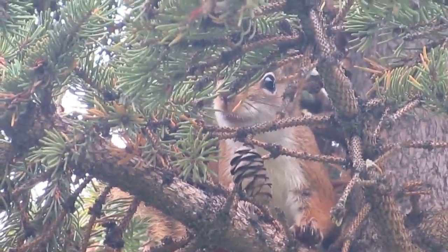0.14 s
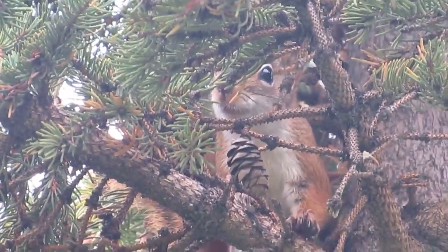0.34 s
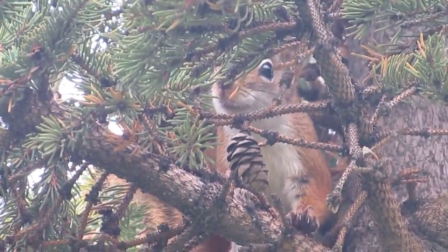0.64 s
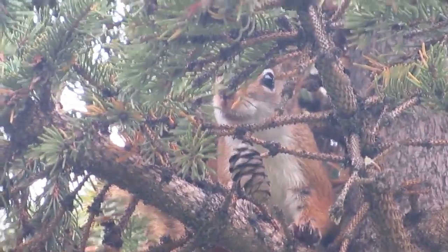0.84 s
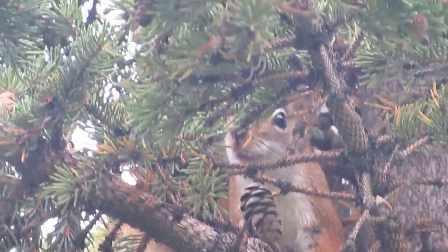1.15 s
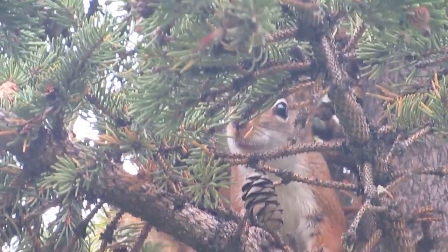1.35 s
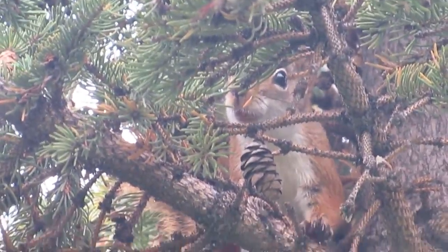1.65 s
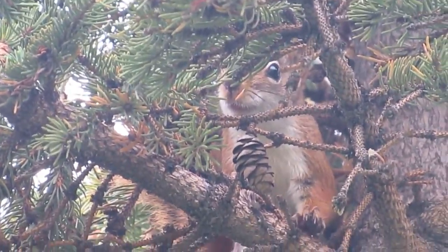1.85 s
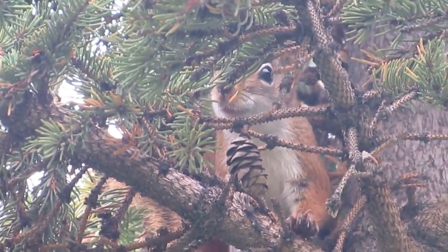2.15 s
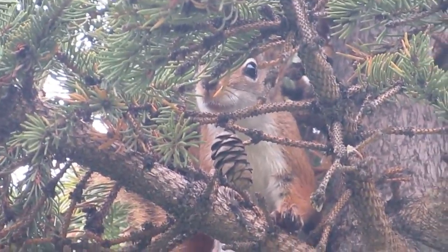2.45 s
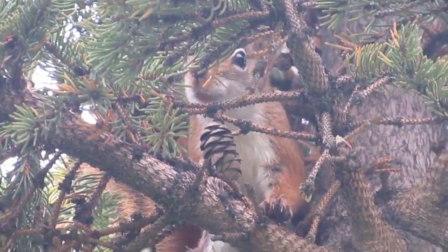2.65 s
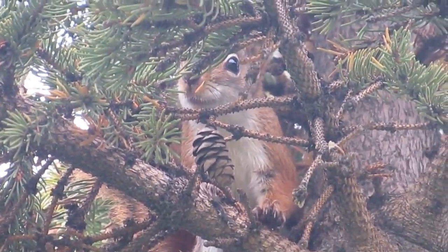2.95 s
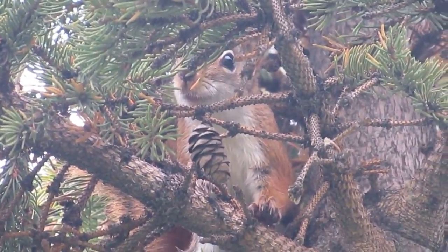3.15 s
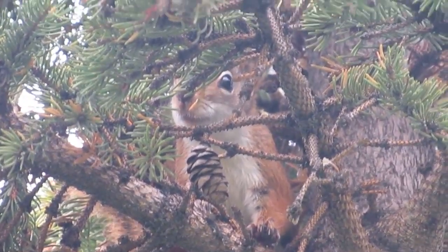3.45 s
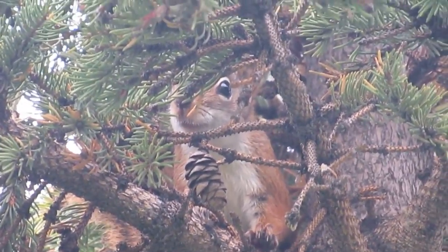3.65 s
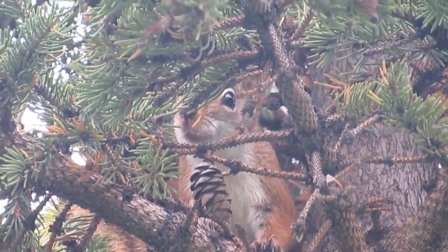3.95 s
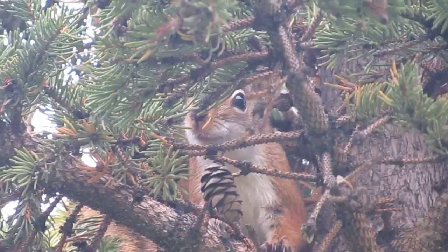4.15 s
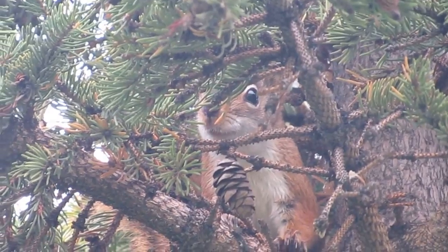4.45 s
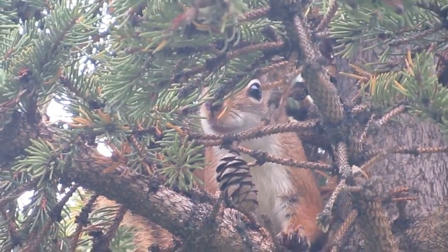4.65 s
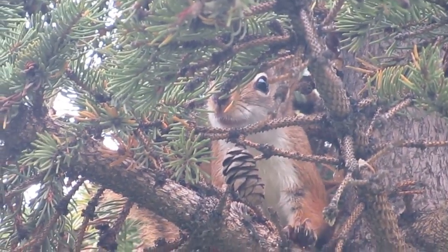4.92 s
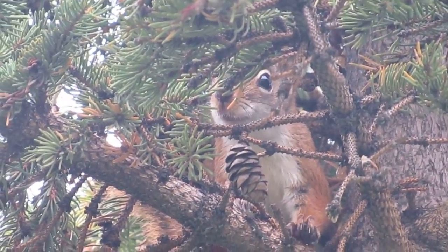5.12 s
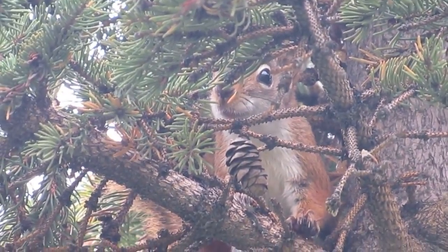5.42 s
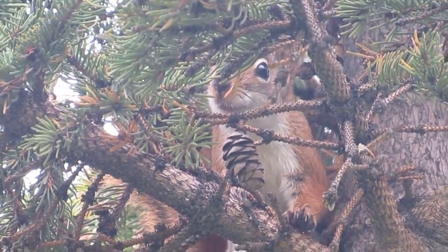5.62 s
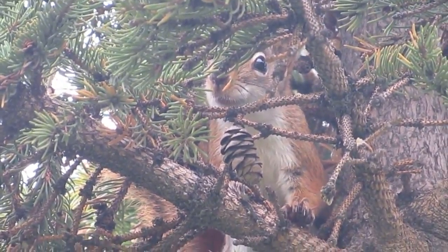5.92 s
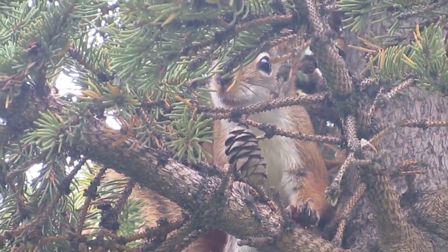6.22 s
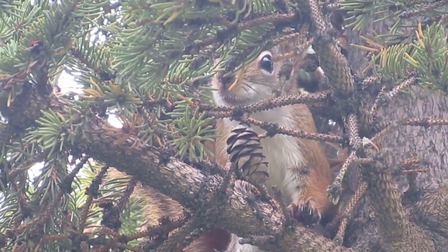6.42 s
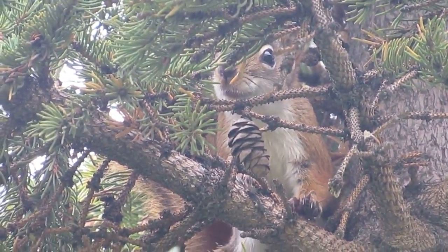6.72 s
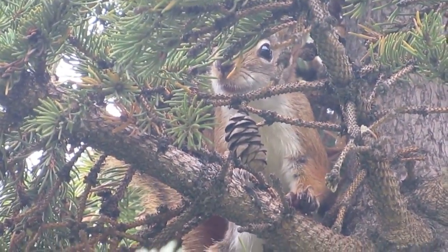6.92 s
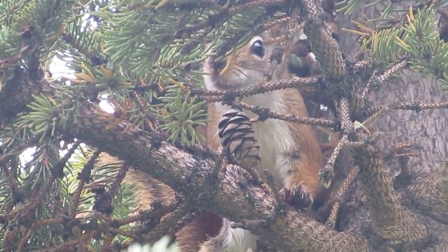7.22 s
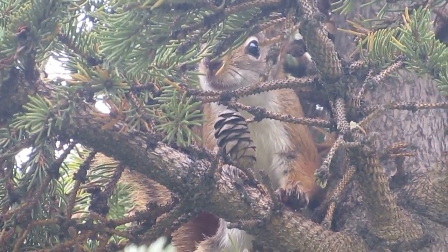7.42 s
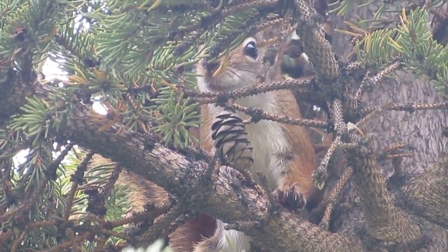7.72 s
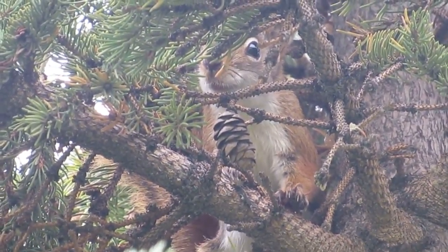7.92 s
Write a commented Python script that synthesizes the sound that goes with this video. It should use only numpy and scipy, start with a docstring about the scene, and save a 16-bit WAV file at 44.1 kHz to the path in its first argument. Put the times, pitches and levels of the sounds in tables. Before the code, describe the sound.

Quick piercing squirrel chirps and spitting sneezes grow louder over buffeting low wind and the swelling rush of a vehicle on a nearby road.

```python
"""A squirrel in a spruce scolds close to the microphone: arched whistles, peeps and nasal sneezes.
Its calls are gliding tones with an octave and sputtering noise, echoed by trunk and boughs.
A vehicle nears on a nearby road, as bands of noise that swell together.
Wind pushes the two microphone ports in opposite directions, as low noise, puffs and thumps.
Behind it needles sigh, a bough scratches once and thin whistles carry from afar."""
import sys
import numpy as np
from scipy import signal
from scipy.fft import rfft, irfft, next_fast_len
from scipy.io import wavfile
from scipy.ndimage import map_coordinates

SR = 44100
rng = np.random.default_rng(int(sys.argv[2]) if len(sys.argv) > 2 else 0)


def inscribe(sig):
    """Save sig as 16-bit PCM at rate SR to the path in sys.argv[1].

    A 1-D sig is mono; a 2-D sig holds one channel per row.
    Samples are clipped to [-1, 1] before scaling.
    """
    pcm = np.round(np.clip(np.atleast_2d(sig).T, -1, 1) * 32767)
    wavfile.write(sys.argv[1], SR, pcm.astype(np.int16))


N = 355887  # length [samples]


def amp(db):
    """Amplitude factor of a level in dB."""
    return 10 ** (np.asarray(db) / 20)


def unit(x):
    """Scale x to rms 1."""
    return x / np.sqrt(np.mean(x ** 2) + 1e-20)


def along(points, hz):
    """Interpolate (frequency [Hz], value) points on a log frequency axis."""
    f, v = np.transpose(points)
    return np.interp(np.log(hz + 1), np.log(f + 1), v)


def curves(rows):
    """One value per sample for each column after the time."""
    s, *cols = np.transpose(rows)
    return [np.interp(np.arange(N) / SR, s, c) for c in cols]


def wobble(rate):
    """A smooth random curve through rate knots a second."""
    knots = rng.standard_normal(int(N * rate / SR) + 4)
    return map_coordinates(knots, [np.arange(N) * rate / SR])


def filtered(x, response):
    """Multiply the spectrum of x by a response of frequency."""
    m = next_fast_len(N + SR // 4)
    return irfft(rfft(x, m) * response(np.fft.rfftfreq(m, 1 / SR)), m)[..., :N]


def noise(spectrum):
    """Coloured noise of rms 1, silent outside its spectrum."""
    inside = lambda hz: (hz > spectrum[0][0]) & (hz < spectrum[-1][0])
    colour = lambda hz: amp(along(spectrum, hz)) * inside(hz)
    return unit(filtered(rng.standard_normal(N), colour))


def rush(spectrum):
    """Stereo noise whose ports agree less toward the treble; the part they share has rms 1."""
    # how alike far sounds are at both ports: (frequency [Hz], correlation [-1..1])
    alike = [(60, 1), (250, 0.97), (600, 0.84), (1000, 0.9), (1500, 0.68), (2500, 0.56), (6000, 0.21),
             (12000, 0.043)]
    turn = lambda hz: np.arccos(np.clip(along(alike, hz), -1, 1)) / 2
    mid = filtered(noise(spectrum), lambda hz: np.cos(turn(hz)))
    side = filtered(noise(spectrum), lambda hz: np.sin(turn(hz)))
    return np.array([mid + side, mid - side]) / np.std(mid)


def arch(s, hz, half_ms, sag, bend, skew):
    """A tone that rises and falls further: samples, place u (-1..1 in the call), gate, pitch, phase."""
    reach = 1.8 * half_ms / 1000
    live = np.arange(max(round((s - reach) * SR), 0), round((s + reach) * SR))
    u = (live / SR - s) * 1000 / half_ms
    pitch = hz * (1 - sag * (1 + skew * np.sign(u)) * abs(u) ** bend)
    gate = np.clip((1.25 - abs(u - .04)) / 0.26, 0, 1) ** 2
    return live, u, gate, pitch, 2 * np.pi * np.cumsum(pitch) / SR


def squirrel():
    """The whistle's main tone favours the left port; the top treble reaches it slightly early."""
    voice = whistles() + peeps() + sneezes()
    # left port, the right gets the opposite: (frequency [Hz], level [dB])
    lean = [(4000, -1.0), (5600, 2.5), (7500, 1.5), (12000, -0.7)]
    left = lambda hz: amp(along(lean, hz)) * np.exp(.3j * (hz / 13000) ** 4)
    direct = filtered(voice, lambda hz: left(hz) ** np.array([[1], [-1]]))
    trunk_s, trunk_db = .008, -11.5  # one clear echo, duller above 8 kHz
    delay = lambda hz: np.exp(-2j * np.pi * hz * trunk_s)
    trunk = filtered(voice, lambda hz: amp(trunk_db) * delay(hz) / (1 + (hz / 8000) ** 6))
    return direct + trunk + amp(-6) * branches(voice)


def whistles():
    """An arched tone and its octave; a slower flap of the folds adds side lines, air leaks past."""
    # whistles: (top of the arch [s], top pitch [Hz], level before the lips [dB],
    # half length [ms], side lines against the octave [dB])
    chirps = [(-0.003, 5800, -28.5, 13, -19), (0.567, 5950, -27.5, 14, -23), (0.7226, 5490, -32, 10.6, -8),
              (1.2629, 5730, -33.5, 13, -15), (1.4324, 5710, -30.5, 14, -16), (2.0633, 5700, -31, 14, -23),
              (2.2933, 5760, -30, 13, -25), (2.539, 4990, -37.5, 8.1, 4), (2.6927, 5670, -30, 11.3, -11),
              (2.8503, 5290, -33.5, 10.6, -5), (3.0633, 5570, -29.5, 13, -9), (3.236, 5630, -28, 12, -9),
              (3.416, 5450, -30.5, 12.6, -6), (3.597, 5560, -27.5, 12.3, -12),
              (3.7849, 5530, -28.5, 13.5, -7), (3.9987, 5570, -27.5, 13.4, -8),
              (4.244, 5650, -25.5, 12, -15), (4.5328, 5660, -24.5, 15, -10), (5.1993, 5670, -21.5, 14, -13),
              (5.3824, 5790, -19.5, 12.4, -14), (5.7882, 5780, -18.5, 13.3, -18),
              (6.378, 5635, -20.5, 13.6, -12), (6.5618, 5740, -19.5, 13.2, -18),
              (7.1803, 5710, -19.5, 14, -19), (7.397, 5750, -20.5, 13.4, -16), (7.532, 5130, -27, 11, -6),
              (7.7253, 5650, -21.5, 12.5, -8), (7.919, 5630, -21, 12, -9)]
    # a higher whistle has a stronger octave: (top pitch [Hz], level against the tone [dB])
    octave_table = [(4950, -29), (5300, -17), (5580, -14), (5720, -9), (5960, -5.5)]
    # colour the lips give the tone: (frequency [Hz], level [dB])
    lips = [(3500, 10), (4500, -4.5), (5100, -6), (5650, -0.5), (5850, 2), (5980, -11), (6300, -6),
            (8500, -4), (10500, 3), (12000, -3), (13200, -6), (14500, -20)]
    # air leaking past: (frequency [Hz], relative level [dB per Hz])
    breath = [(3500, -2), (5500, 8.5), (7500, -10), (9500, -3.5), (12000, -6), (13200, -13), (14000, -29),
              (15000, -30)]
    tone, air, flap_hz = np.zeros(N), np.zeros(N), 1510
    for s, hz, db, half_ms, flap_db in chirps:
        live, u, gate, pitch, phase = arch(s, hz, half_ms, sag=.21, bend=2.82, skew=0.102)
        phase = phase + np.cumsum(rng.normal(0, .012, len(u)))  # the pitch trembles
        flap_phase = 2 * np.pi * flap_hz * live / SR + np.cumsum(rng.normal(0, 0.076, len(u)))
        flap = 2 * amp(flap_db - 6.5 * u ** 2) * np.cos(flap_phase)
        octave = amp(along(octave_table, hz) - 40 * u ** 4) * (1 + flap) * np.sin(2 * phase)
        # the lips part just before the tone
        tick = amp(-13.5) * np.exp(-((u + 1.13) / .12) ** 2) * np.sin(2 * np.pi * 6450 * live / SR)
        sung = gate * amp(-10 * u ** 2) * ((1 + 0.063 * flap) * np.sin(phase) + octave)
        tone[live] += amp(db) * (sung + tick)
        air[live] += amp(db - 21) * np.clip((1.3 - abs(u - .15)) / 0.13, 0, 1)
    rasp = unit(amp(2.2 * wobble(400)))
    return filtered(tone, lambda hz: amp(along(lips, hz))) + air * rasp * noise(breath)


def peeps():
    """About half the whistle's pitch, so overtones pass through the mouth; the voice is unsteady."""
    # low peeps: (top of the arch [s], top pitch [Hz], call level [dB], half length [ms],
    # share of pitch lost at the ends [0-1], fundamental against the call level [dB])
    peep_rows = [(.3828, 2860, -49, 6.5, 0.018, -30), (2.418, 3100, -51, 7, 0.09, 4),
                 (4.6703, 2960, -40, 6.4, .07, 5.5), (5.9216, 3160, -34, 8, 0.13, -6)]
    # resonances of the mouth: (frequency [Hz], level [dB])
    mouth = [(2500, 3), (4300, -2), (5100, -12), (5700, -2), (6300, -11), (8500, -12), (11500, -6.5),
             (13500, -8)]
    out = np.zeros(N)
    for s, hz, db, half_ms, sag, low_db in peep_rows:
        live, u, gate, pitch, phase = arch(s, hz, half_ms, sag, bend=2.2, skew=0.34)
        phase = phase + np.cumsum(rng.normal(0, 0.02, len(u)))
        overtone = lambda k: amp(along(mouth, k * pitch) - 7.6 * (k - 3)) * np.sin(k * phase)
        upper = sum(overtone(k) for k in (2, 3, 4))
        out[live] += amp(db - 3.5 * u ** 2) * gate * (upper + amp(low_db) * np.sin(phase))
    return out * (1 + 0.48 * np.tanh(wobble(250)))


def sneezes():
    """Air forced through the nose in quick spits; a lower nasal rasp follows as the blast weakens."""
    # sneezes: (time [s], blast level [dB], fade [ms], late nasal rasp against the blast [dB])
    sneeze_rows = [(0.106, -40, 6, -23), (.825, -49, 5, -20), (0.99, -26.5, 15, -13), (1.55, -68, 8, -20),
                   (1.671, -32.5, 17.6, -12), (4.802, -19, 19, -13), (5.504, -32, 5.2, -20),
                   (5.902, -51, 5, -20), (4.652, -60, 4, -20), (6.678, -50, 6, -20),
                   (6.031, -19, 15.7, -11), (6.805, -20, 20, -10.5)]
    # blast through the nose: (frequency [Hz], relative level [dB per Hz])
    nose = [(4200, -17), (5500, -34), (7500, -33), (8500, -23.5), (10000, -8.5), (11600, 2), (13100, -17.5),
            (15500, -40)]
    # the lower rasp: (frequency [Hz], relative level [dB per Hz])
    nasal = [(2000, -16), (2700, -2), (3100, -1.5), (3550, -0.5), (4600, -13), (5500, -4), (6200, 3.5),
             (6700, -10), (7400, -17), (9000, -14), (10000, -30)]
    blast, ring = np.zeros(N), np.zeros(N)
    for s, db, fade_ms, ring_db in sneeze_rows:
        live = slice(round((s - .03) * SR), round((s + .12) * SR))
        u = (np.arange(live.start, live.stop) / SR - s) * 1000 / fade_ms
        rise = np.exp(-abs(u / 0.19) ** 1.2)
        fall = 0.88 * np.exp(-abs(u) ** 2.2) + 0.11 * np.exp(-abs(u / 2) ** 4)
        blast[live] += amp(db) * np.where(u < 0, rise, fall)
        ring[live] += amp(db + ring_db) * np.exp(-abs((u - 1.05) / 1.0) ** 3)
    flaps = np.cumsum(155 + 45 * wobble(60)) / SR  # the nostrils flap shut unevenly
    spits = np.cumsum(470 + 130 * wobble(200)) / SR
    pulses = (1 + .5 * np.sin(2 * np.pi * flaps)) * (.6 + np.sin(np.pi * spits) ** 4)
    sputter = unit(pulses * amp(1.5 * wobble(500)))
    rasp = unit(amp(2.0 * wobble(200)))
    return blast * sputter * noise(nose) + ring * rasp * noise(nasal)


def branches(x):
    """Trunk and boughs scatter calls into a short tail that differs by port and shifts as boughs sway."""
    # colour of the echoes: (frequency [Hz], level [dB])
    boughs = [(3000, -8), (5700, 2.5), (8000, 4), (12000, -8.5), (15000, -3)]
    t, step = np.arange(SR // 5) / SR, SR // 8
    late = np.pad(x, (150, 0))[:N]  # 3.4 ms of travel
    dull = filtered(late, lambda hz: amp(along(boughs, hz)))
    out, fade = np.zeros((2, N + SR)), np.hanning(2 * step)
    for at in range(-step, N, step):  # overlapping pieces, each with its own tail
        start = max(at, 0)
        decay = amp(-60 * t / 0.053) + amp(-23 - 60 * t / .3)
        tail = rng.standard_normal((2, len(t))) * decay
        piece = dull[start:at + 2 * step] * fade[max(-at, 0):][:N - start]
        echo = signal.fftconvolve(piece[None], tail / np.linalg.norm(tail[0]), axes=1)
        out[:, start:][:, :echo.shape[1]] += echo
    return out[:, :N]


def road():
    """Engine rumble and drone, tyre roar, whine and hiss swell together as the vehicle nears."""
    # the vehicle nears: (time [s], tyre roar [dB], engine over tyres [dB], extra brightness [dB])
    approach = [(0, -31, 3.5, 2), (.1, -33, 0, 1.5), (.83, -29.5, -3, 1.5), (1.2, -33, 3, 0.5),
                (1.5, -33.5, -2.5, -1.5), (1.72, -36, -1, -1), (2.3, -32, -2, -1.5), (2.94, -29, -4, 0),
                (3.7, -26.5, -3, -1), (4.63, -22, -2, -1.5), (5.03, -21.5, -3.5, -0.5),
                (5.57, -19.5, -3.5, 2), (6.2, -20, -3.5, 0.5), (6.77, -20, -1.5, 1.5), (7.01, -22, -5, 0.5),
                (7.28, -20, -4.5, 0), (7.69, -21.5, -3, .5), (7.91, -19.5, -1, -1), (8.07, -22, -4, 1)]
    # engine rumble and drone, then tyre roar, whine and hiss:
    # each (frequency [Hz], relative level [dB per Hz])
    rumble_colour = [(15, -33), (25, -7), (70, 1), (110, 1), (150, -4), (190, -20.5), (240, -40)]
    drone_colour = [(120, -13), (165, -3), (215, 0), (300, -5.5), (440, -9), (560, -15.5), (700, -57)]
    tyre_colour = [(480, -20), (560, -14.5), (740, -2.5), (910, -0.5), (1150, -3), (1400, -7.5),
                   (1700, -19.5), (2000, -19)]
    whine_colour = [(1150, -22), (1500, -0.5), (1700, 0), (1950, -1.5), (2450, -9.5), (3090, -12.5),
                    (3700, -18.5), (4500, -33)]
    hiss_colour = [(2500, -29), (3500, 7.5), (4600, 7.5), (7000, -1.5), (9500, -12), (12000, -30)]
    # left port, the right gets the opposite: (frequency [Hz], level [dB])
    sideways = [(100, 0.5), (500, 0.07), (1200, -.5), (3000, -.5), (8000, 0)]
    tyre_db, engine_db, bright_db = curves(approach)
    # near_db holds when the tyre roar is at -20 dB
    level = lambda near_db, grows: near_db + grows * (tyre_db + 20)
    swell = wobble(7)
    rumble = amp(tyre_db + engine_db + .8 * wobble(4.1)) * rush(rumble_colour)
    drone_db = level(-23.5, grows=1.093) + 0.36 * engine_db + 1.04 * wobble(6)
    drone = amp(drone_db) * rush(drone_colour)
    tyres = amp(tyre_db + 0.44 * swell) * rush(tyre_colour)
    whine = amp(tyre_db - 10.0 + bright_db + .55 * swell) * rush(whine_colour)
    hiss = amp(level(-47.5, grows=0.96) + 0.62 * bright_db) * rush(hiss_colour)
    vehicle = rumble + drone + tyres + whine + hiss
    return filtered(vehicle, lambda hz: amp(np.array([[1], [-1]]) * along(sideways, hz)))


def wind():
    """Eddies push one port while they pull the other; a little reaches both alike."""
    # steady stream: (time [s], buffeting before a 3.5 dB cut [dB], flutter over low push [dB])
    stream = [(0, -13, -5), (.45, -15.5, -8), (.6, -29, -17), (.86, -14, -2.5), (1.3, -21, 0),
              (1.6, -10, -7), (1.95, -33, -11), (2.35, -24, -2), (2.76, -16.5, -5), (3, -33, -20),
              (4.07, -36, -14), (4.4, -28, -11), (5.8, -27, -16), (6.55, -22, -14), (6.78, -28, -14),
              (7.3, -27, -9), (7.5, -32, -5), (8.07, -34, -3)]
    # puffs: (peak [s], level [dB], rise and fall [ms], flutter over low push [dB])
    gusts = [(.06, -11, 35, 2), (.27, -10, 20, 3), (.33, -9, 20, -13), (.87, -22, 25, -4),
             (1.13, -5.5, 28, 6), (1.23, -8.5, 23, 2), (1.491, -1.5, 15, -12), (1.64, -10, 28, -5),
             (1.83, -15, 25, 7), (2.07, -28, 20, -4), (2.3, -17, 30, -7), (2.57, -14, 30, -8),
             (3.19, -26, 40, -20), (3.38, -28, 30, -17), (3.87, -26, 30, -10), (4.21, -22, 40, -15),
             (4.4, -24, 30, -13), (4.77, -21, 30, -14), (5.54, -25, 60, -21), (6.16, -22, 40, -8),
             (6.55, -16, 25, -20), (6.9, -4.5, 30, -11), (7.29, -23, 20, -2), (7.39, -23, 25, -7)]
    # eddies hitting a port: (time [s], swing before its envelope [dB], pitch [Hz])
    thumps = [(.035, -8, 110), (.063, -1, 120), (.254, -3, 120), (.859, -4, 110), (1.124, 1, 140),
              (1.162, -4, 110), (1.217, -2.5, 90), (1.491, -13, 80), (1.53, -0.5, 120), (1.591, -4, 129),
              (6.896, -6, 90), (7.392, -6, 70)]
    # low push, then faster flutter: each (frequency [Hz], relative level [dB per Hz])
    push = [(8, -32), (18, -7), (50, -0.5), (95, -8), (130, -12), (200, -65)]
    flutter = [(60, -53), (100, 2.5), (140, 0.5), (250, -13), (350, -36), (520, -29), (700, -61)]
    db, flutter_db = curves(stream)
    low = amp(db - 3.5 + 2.5 * wobble(12))
    high = low * amp(flutter_db + 3 * wobble(15))
    for s, peak_db, slope_ms, share_db in gusts:
        shape = np.exp(-abs(np.arange(N) / SR - s) * 1000 / slope_ms)
        puff = amp(peak_db) * shape / np.sqrt(1 + amp(2 * share_db))
        low, high = np.hypot(low, puff), np.hypot(high, puff * amp(share_db))
    lumps = unit(amp(2.0 * wobble(30)))
    gust = low * noise(push) + high * lumps * noise(flutter)
    gust = gust / (1 + abs(gust / .38) ** 3) ** (1 / 3)  # stream and puffs have a limited swing
    for s, peak_db, hz in thumps:
        live = np.arange(round((s - .03) * SR), round((s + .03) * SR))
        u = (live / SR - s) * hz
        gust[live] += amp(peak_db) * np.sin(2 * np.pi * u) * np.exp(-(u / 0.47) ** 2)  # one swing
    shared = amp(-20) * low * noise(push) + amp(-18) * high * noise(flutter)
    return gust * np.array([[1], [-1]]) + shared


def tree():
    """Needles sigh, a bough scratches once, thin whistles carry from afar."""
    # air in the needles: (time [s], level [dB]), and its colour: (frequency [Hz], relative [dB per Hz])
    crown = [(0, -74), (.4, -76), (.94, -73), (1.8, -79), (2.56, -70.5), (2.92, -68), (3.4, -74),
             (4, -69.5), (5.3, -64.5), (7.28, -63.5), (8.07, -64)]
    sigh_colour = [(7000, -18), (9500, -0.5), (12500, -7), (14500, -17), (15700, -36)]
    # needles scratching: (frequency [Hz], relative level [dB per Hz])
    needles = [(2200, -29), (3200, 6), (4500, -4), (7300, -2.5), (9500, -19), (14000, -28)]
    # far whistles: (start [s], end [s], first pitch [Hz], last pitch [Hz], level before panning [dB])
    thin = [(.27, .76, 10550, 10600, -75), (2.42, 2.72, 12100, 12400, -75), (3.0, 3.05, 7800, 7300, -57)]
    scratch_s, scratch_db, rise_s, fade_s = 2.065, -42.5, .004, 0.09
    t = np.arange(N) / SR - scratch_s
    stroke = amp(scratch_db) * np.exp(-abs(t) / np.where(t < 0, rise_s, fade_s))
    rough = stroke * unit(amp(2.5 * wobble(150)))
    scratch = rough * (noise(needles) * np.array([[1], [-1]]) + 0.85 * noise(needles))
    out = amp(curves(crown)[0] + 0.83 * wobble(7)) * rush(sigh_colour) + scratch
    for start, end, hz, end_hz, db in thin:
        live = np.arange(round(start * SR), round(end * SR))
        pitch = np.linspace(hz, end_hz, len(live)) + 90 * wobble(90)[live]
        tone = np.sin(2 * np.pi * np.cumsum(pitch) / SR)
        level = amp(db + 3.1 * wobble(25.0)[live]) * np.hanning(len(live)) ** .3
        out[:, live] += level * tone * [[1.4], [.3]]  # mostly at the left port
    return out


def scene():
    """Squirrel, road, wind and tree together at the two ports."""
    return squirrel() + road() + wind() + tree()


def record(dry):
    """The strongest peaks clip; the recorder's band-splitting filter leaves narrow dips and a top limit."""
    # narrow dips in the recorder's band-splitting filter: (frequency [Hz], width [Hz], depth [0-1])
    notches = [(3920, 160, 0.74), (7940, 94, 0.9)]
    top_hz = 15690
    held = np.clip(dry, -.97, .97)
    dip = lambda hz, c, w, d: 1 - np.clip(d, 0, 1) * np.exp(-((hz - c) / w) ** 2)
    dips = lambda hz: np.prod([dip(hz, c, w, d) for c, w, d in notches], axis=0)
    return filtered(held, lambda hz: dips(hz) * (hz < top_hz))


dry = scene()
out = record(dry)
inscribe(out)
```